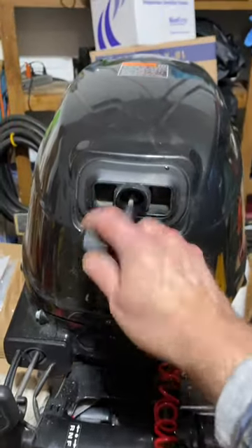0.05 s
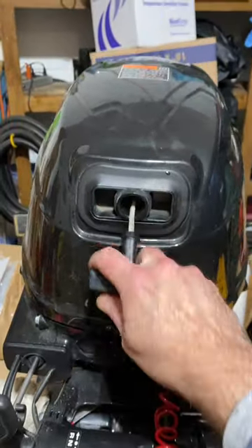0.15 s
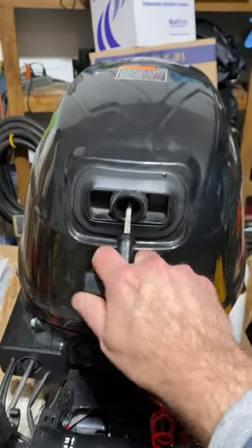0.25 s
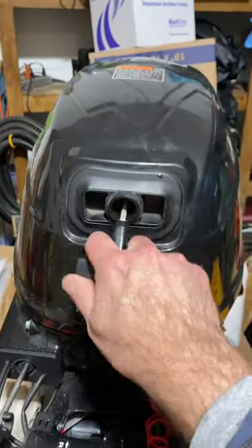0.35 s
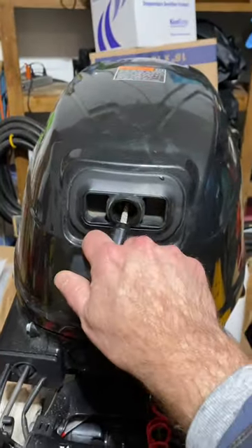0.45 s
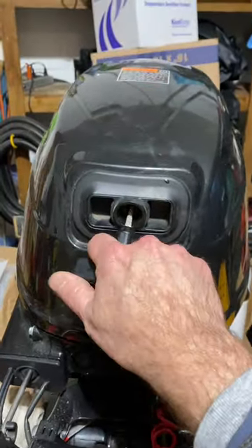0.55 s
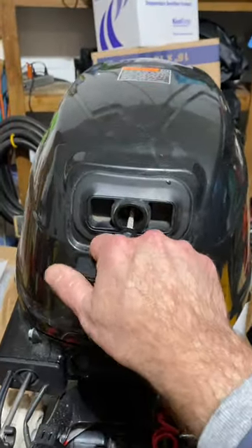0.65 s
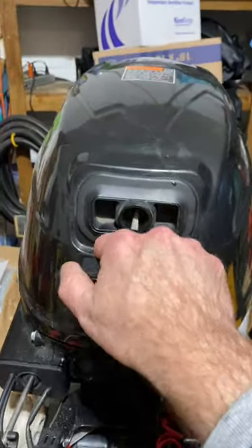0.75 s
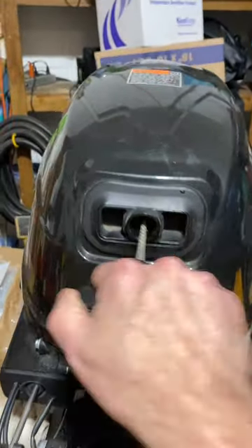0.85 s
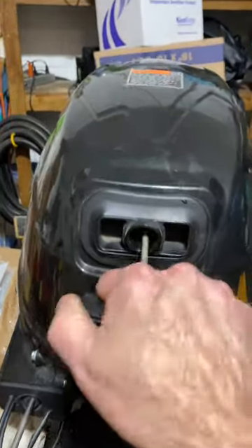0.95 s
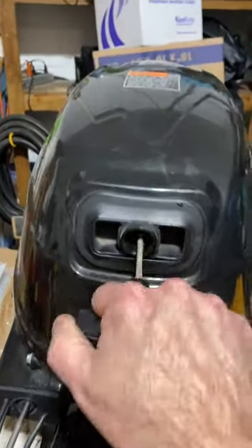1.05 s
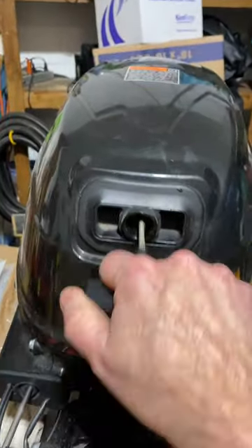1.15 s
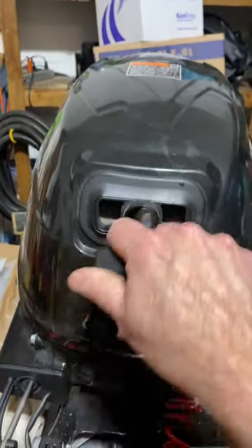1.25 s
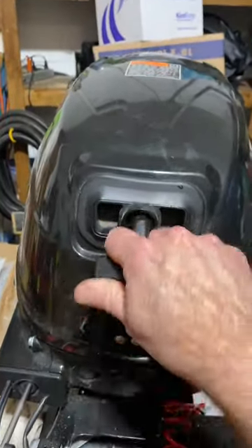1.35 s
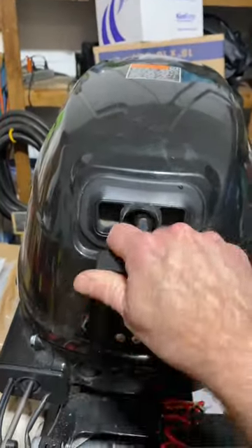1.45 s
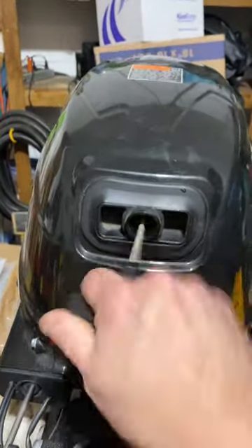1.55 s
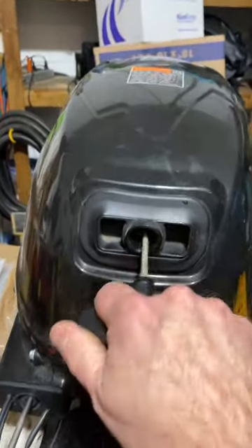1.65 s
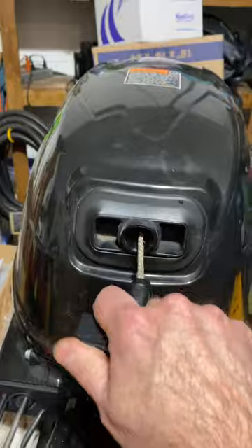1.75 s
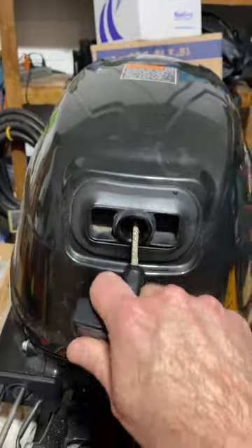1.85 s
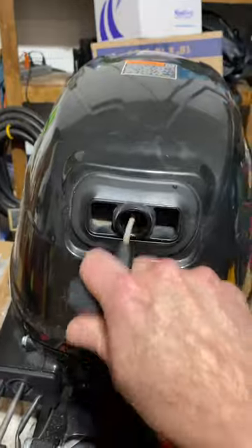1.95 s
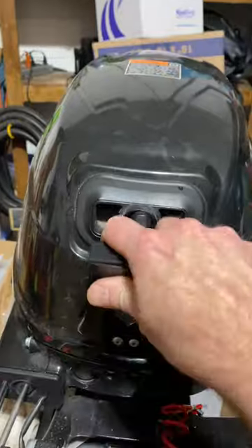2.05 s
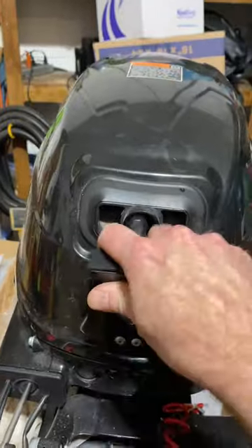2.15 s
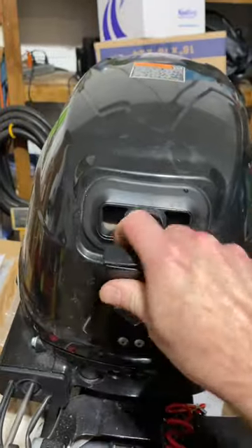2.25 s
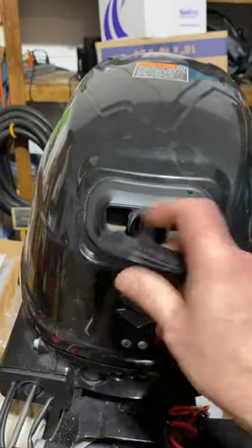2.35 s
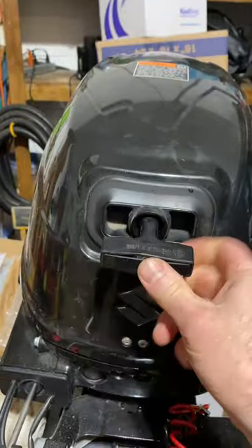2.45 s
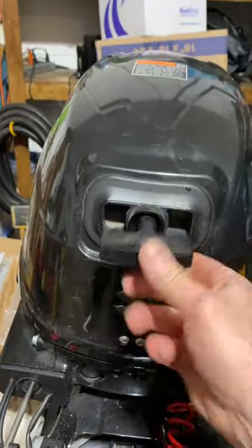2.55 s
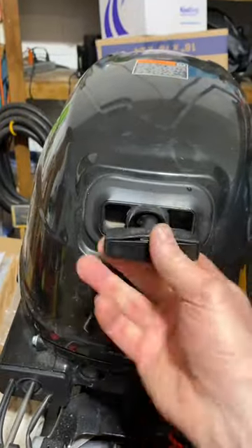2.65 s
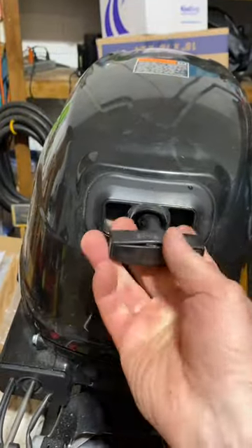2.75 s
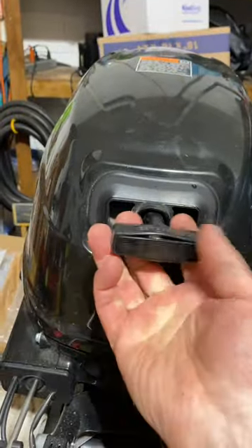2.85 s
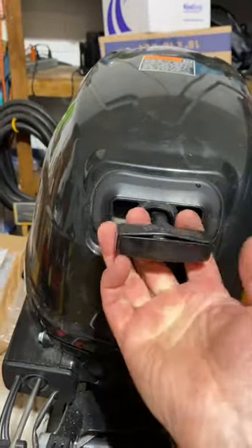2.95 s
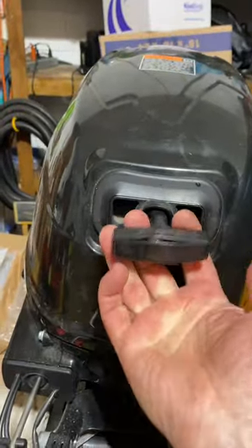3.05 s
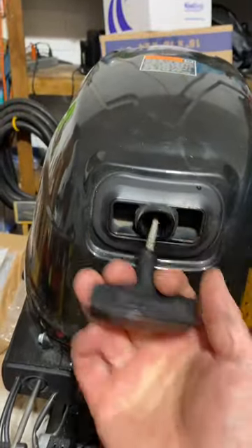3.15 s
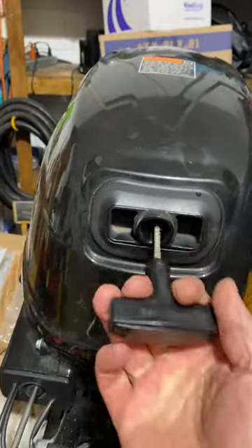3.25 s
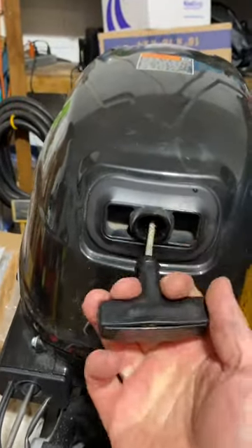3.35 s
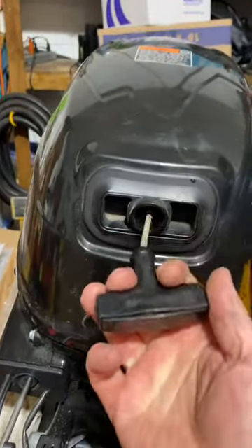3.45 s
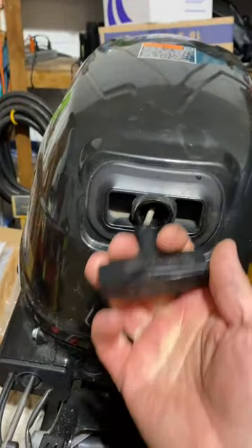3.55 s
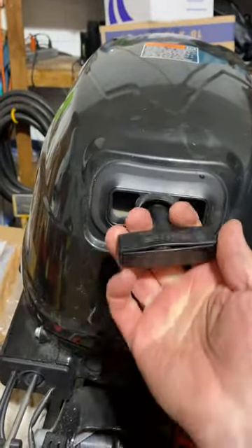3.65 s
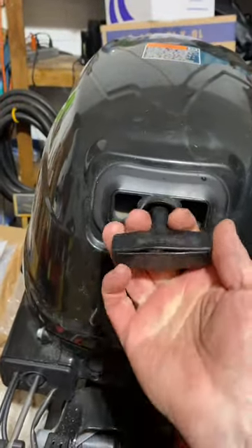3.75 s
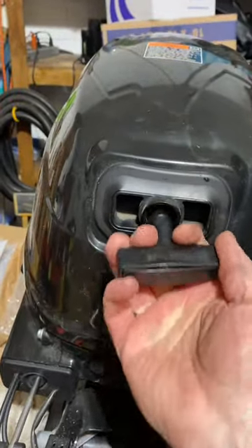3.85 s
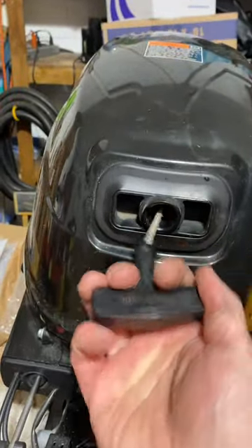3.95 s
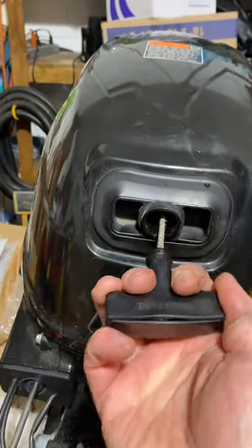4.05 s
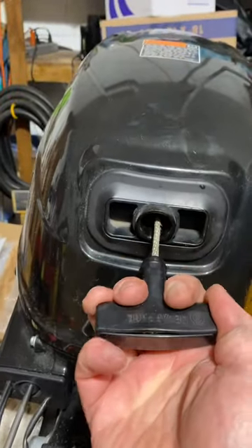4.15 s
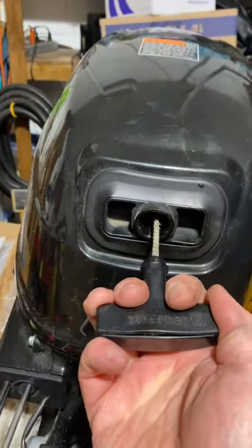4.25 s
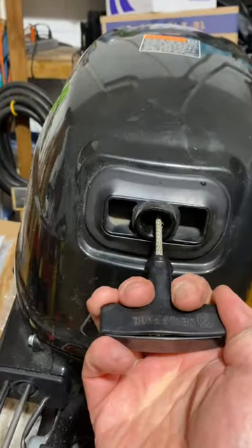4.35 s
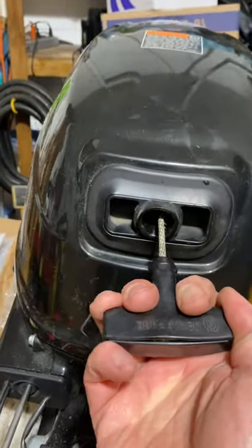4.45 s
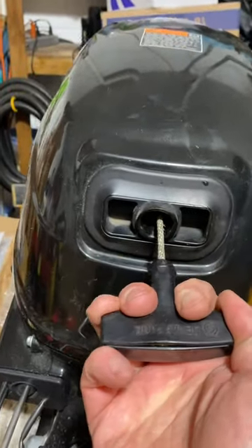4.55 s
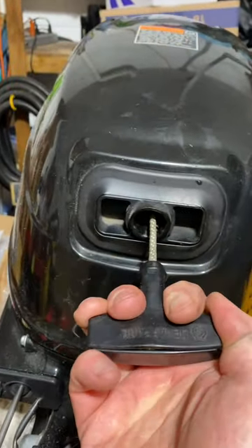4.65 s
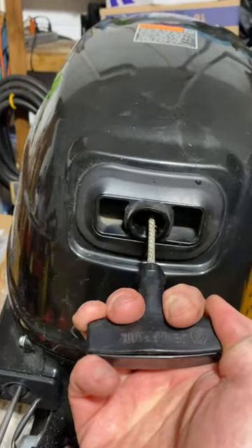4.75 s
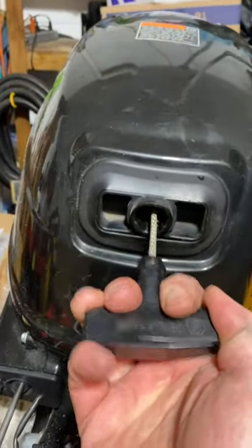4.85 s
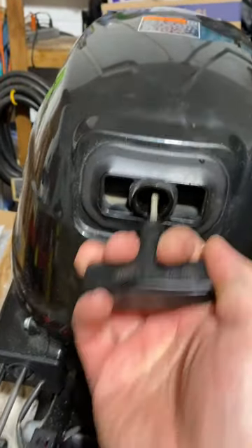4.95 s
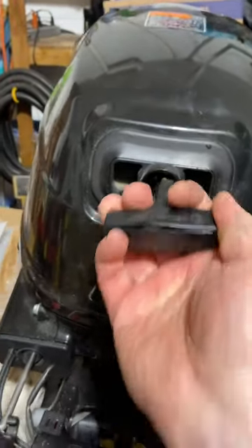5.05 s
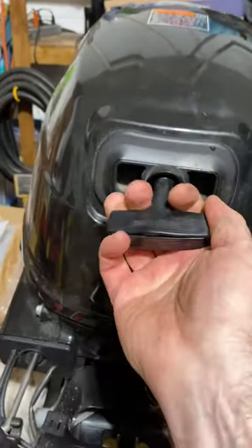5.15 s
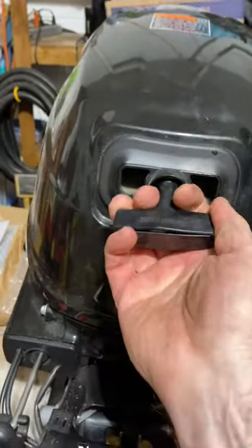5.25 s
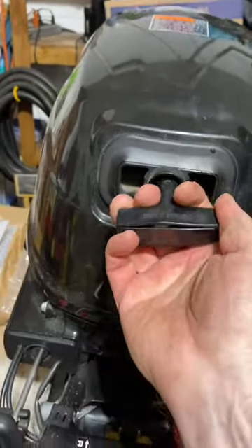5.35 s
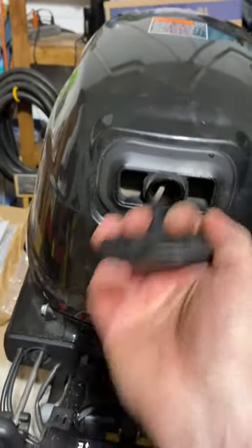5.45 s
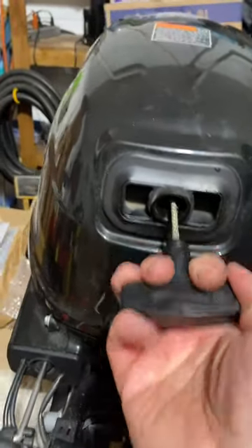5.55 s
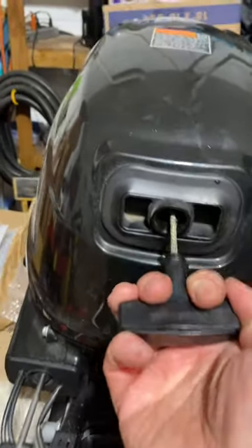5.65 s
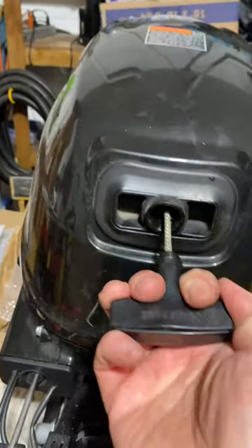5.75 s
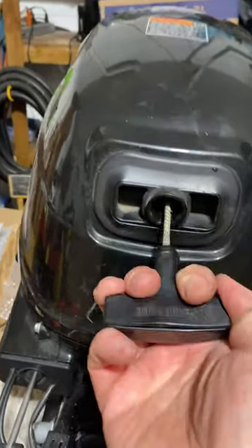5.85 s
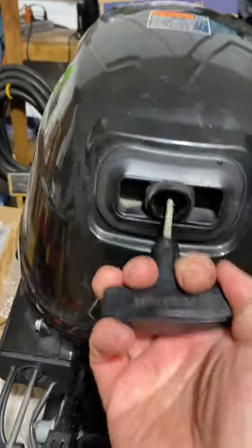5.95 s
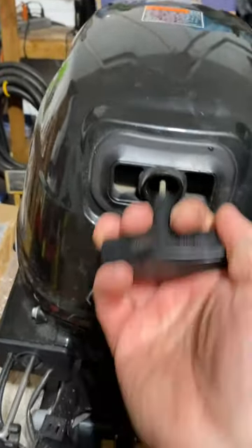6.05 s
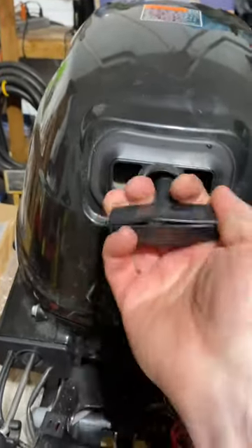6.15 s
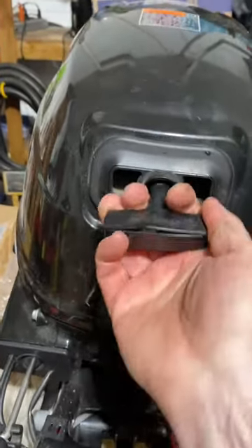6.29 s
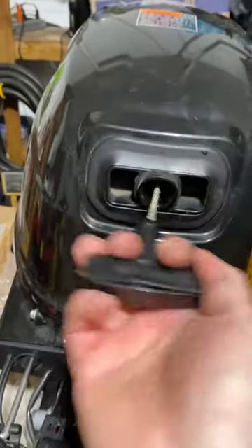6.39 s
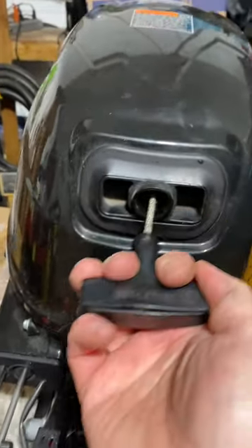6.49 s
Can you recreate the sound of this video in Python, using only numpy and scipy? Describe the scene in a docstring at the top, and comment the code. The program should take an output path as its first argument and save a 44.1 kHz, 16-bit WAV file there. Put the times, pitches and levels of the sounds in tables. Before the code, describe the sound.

Six short rope tugs jam with loud, clattering knocks, separated by small rattles, brief rewinding rub and light handle taps over faint room hum.

```python
"""Room hum, hiss and a faint whine are heard first; then a starter rope on a seized outboard is yanked six times.
Shaped noise makes the garage air and a few swishes; dying modes, crash noise and clicks make rattles in the cowl.
Each pull rubs up the slack through tiny slips and stops dead with a knock that rings the plastic cowl; a faint
bright burst comes just before the third. The rope jerks back, and five times the spring rewinds it with more rub.
The handle taps its hollow seat, with one soft ring among the taps; scattered echoes place it all in the garage."""
import sys
import numpy as np
from scipy import signal
from scipy.fft import rfft, irfft
from scipy.io import wavfile
from scipy.ndimage import uniform_filter1d

SR = 44100
rng = np.random.default_rng(int(sys.argv[2]) if len(sys.argv) > 2 else 0)


def to_wav(s):
    """Save 16-bit WAV."""
    ch = np.atleast_2d(s).T  # columns
    pcm = np.round(np.clip(ch, -1, 1) * 32767)  # PCM
    wavfile.write(sys.argv[1], SR, pcm.astype(np.int16))


N = 287532

# room hum and hiss, relative spectrum: pitch_hz, density_db (dB per Hz)
AIR_SPECTRUM = [(20, -32), (40, -3.5), (65, -0.5), (81, -14), (98, -3), (126, -10), (216, -15),
                (363, -19.5), (600, -25), (1600, -28.5), (2760, -26.5), (6500, -37), (12000, -44),
                (12600, -40), (13400, -68)]
AIR_DB = -41
# how alike the hiss is left and right: pitch_hz, likeness (0 to 1)
AIR_LIKENESS = [(150, 1), (350, 0.88), (700, 0.38), (1800, 0.88), (3000, 0.86), (5500, 0.55), (7000, 1),
                (15000, 1)]
# faint fuzzy whine in the room, before its waver: pitch_hz, width_hz, fuzz_db, pure_core_db
WHINE = (1264, 83, -58, -64)
WHINE_WAVER_DB, WHINE_WAVER_S = 1.2, 0.2
# faint airy swishes, perhaps sleeve or rope: start_s, length_s, pitch_hz, width_hz, level_db (before the swell shape)
SWISHES = [(4.08, .17, 8600, 700, -57), (5.36, .09, 5600, 700, -54), (5.235, .08, 1450, 160, -46),
           (.22, .06, 1600, 200, -54)]
# garage echo decay: pitch_hz, t60_s
GARAGE_DECAY = [(150, 0.22), (600, 0.52), (2000, 0.34), (6000, 0.36), (12000, 0.2)]
# pawls and pulley rattle inside the cowl; the row at 3.112 s is a faint bright burst just before the third knock:
# start_s, level_db, bass_db, upper_middle_db, treble_db
RATTLES_AND_BURST = [(0.363, -30.5, 3.5, -1.5, -14.5), (0.817, -36.5, -18, 7, -6),
                     (0.914, -29.5, -10, -5, -1.5), (1.017, -34.5, -20, 9.5, 1.5),
                     (1.121, -39.5, -29, -16, -25), (1.135, -34, -4, -1, -20), (1.154, -29, 3.5, 1.5, -6),
                     (1.188, -32, 1, 1, -16), (1.397, -41, 2, -3, -15), (1.515, -42, -4, -4, -2),
                     (1.548, -33, -14, 6, 7), (1.828, -40.5, -31, 8, 1), (1.876, -30, -5.5, -1.5, -8),
                     (1.93, -33, 19, -8, -25), (1.946, -33, -1.5, 1, -21), (2.584, -36.5, 38, 4, -20),
                     (3.087, -37, -12, 0, -16), (3.112, -32.5, 7, 20, 8), (3.224, -40.5, 2, -6, 16),
                     (3.236, -39, 4, -9, 13), (3.501, -44, 17, 0, -22), (3.519, -35.5, -4, -5, -17),
                     (3.527, -35, -10, -8, -18), (3.535, -41, 5, 1, -18), (3.59, -45.5, -13, 14, 14),
                     (3.853, -40.5, 20, 10, 6), (3.918, -39, -2, 9, -9), (4.408, -37, -8, -0.5, -0.5),
                     (4.982, -37, -12, -8, -24), (5.001, -31, -1, -9, -30), (5.009, -28, -3, -3, -23),
                     (5.028, -28, 2.5, 2, -12), (5.156, -32, 10, -8, -33), (5.188, -35.5, 24, -2, -30),
                     (5.472, -33, -3, 16, 7), (5.546, -31, 8, 0, 11), (5.991, -32.5, -19, -1, -5),
                     (6.047, -30.5, -6, -13, -28), (6.066, -29, 1, 1, -11), (6.111, -38.5, 8, -5, 1),
                     (6.331, -41.5, -11, 13, 0)]
RATTLE_DAMPING_DB_PER_S, RATTLE_CHATTER_S = 441, 0.00259
# cowl and engine block modes, before extra damping: pitch_hz, level_db, t60_s
COWL_MODES = [(137.4, -3.5, 0.16), (210.7, 11, 0.046), (338, 5, 0.091), (437.5, 2.5, 0.11),
              (598.4, -1, 0.13), (632, 1, 0.095), (694, -10, 0.041), (895.7, 1, 0.11), (983, -10, 0.12),
              (1144, -4, 0.12), (1224, -3, 0.058), (1375, -11.5, 0.13), (1536, -4, 0.045), (1642, -7, 0.1),
              (2019, -6, 0.047), (2112, -12.5, 0.038), (2258, -7, 0.033), (2420, -1.5, 0.026),
              (3075, -17, 0.073), (4100, -18, 0.022), (5120, -8, 0.024)]
# contact noise of hard parts, relative: pitch_hz, level_db
CRACK_SPECTRUM = [(2000, -1.5), (4000, -8.5), (5500, -9.5), (7500, -3), (10000, -12), (13000, -16),
                  (16500, -17)]
# loose metal parts crash together, relative and before extra damping: pitch_hz, level_db, t60_s
CRASH_BANDS = [(77.4, -22, 0.15), (235, 2.5, 0.3), (570, -2, 0.27), (1520, -9.5, 0.11), (2510, -9.5, 0.1),
               (2700, -18, 0.18), (4700, -13, 0.059), (7440, -19.5, 0.064), (11900, -27.5, 0.066),
               (16000, -38, .02)]
# the rope stops dead: start_s, level_db (before swell and bite), bass_db, upper_middle_db, treble_db, chatter_s,
# bite_hz, bite_db, swell_s, slack_s (before the stop), slack_start_rub_db, slack_end_rub_db, rebound_rub_db
KNOCKS = [(0.837, -10.5, -2.5, 0.5, 1, 0.0091, 1490, 7.5, 0.0058, 0.019, -53, -34, -31.5),
          (1.556, -8, -3.5, 3, 0, 0.011, 980, 4, 0.0053, 0.053, -51, -34.5, -34),
          (3.1233, -7.5, -4.5, 3.5, -1, .017, 1090, 2, 0.0013, 0.039, -40, -32, -33),
          (3.942, -11.5, -4, -2, -1.5, 0.014, 1000, -3.5, 0.013, 0.053, -55, -36.5, -40),
          (5.483, -8, -3, 5.5, 1.5, .012, 950, 3.5, 0.0056, 0.038, -48, -35, -33),
          (6.37, -6, -3.5, 1, 0.5, .012, 596, -0.5, 0.003, 0.036, -49, -20.5, -32)]
KNOCK_DAMPING_DB_PER_S = 133
SWELL_FROM_DB = -3  # a knock builds from this level while the parts jam
BITE_OCTAVES = 0.26  # width of the band singled out in each knock
# rope rub through the cowl, relative: pitch_hz, level_db
RUB_SPECTRUM = [(100, -3), (200, 3.5), (430, -11.5), (900, -7.5), (1500, -16.5), (2500, -12), (3500, -13.5),
                (6000, -32.5)]
# dull drone of the turning pulley, set beside the rub: pitch_hz, width_hz, level_db
PULLEY = (333, 260, -4.5)
SLACK_BRIGHT_DB = -11.5  # hiss beside the rub while slack is taken up
# the rope jerks back and settles
REBOUND_AFTER_S, REBOUND_S, REBOUND_FADE_DB, REBOUND_BRIGHT_DB = 0.0357, 0.22, -16.5, -23.5
# the spring winds the rope back: start_s, length_s, rub_db (as it starts)
REWINDS = [(1.12, 0.3, -39), (1.824, 0.33, -41.5), (3.496, 0.23, -48), (4.985, 0.35, -40),
           (5.997, 0.24, -36.5)]
REWIND_FADE_DB, REWIND_BRIGHT_DB = -8, -22
SLIPS_PER_S, SLIP_DAMPING_DB_PER_S, SLIP_RING_DB = 700, 506, -4
LURCH_DB, LURCH_S = 1.6, 0.012  # the rope moves in fits and starts
# the handle taps its seat; the row at 5.066 s is a soft ring near 1 kHz without an audible click:
# start_s, level_db (drive into the modes and click), bass_db, upper_middle_db, treble_db
TAPS_AND_RING = [(1.297, -19.5, -1.5, -2, -9), (1.347, -28.5, 3.5, 12, 11.5), (2.0478, -18, 0, -12, 8),
                 (2.113, -36, 7, -5, -5), (2.226, -33, -6, 3, -25), (2.379, -28.5, -7, 0.5, -19),
                 (2.409, -32.5, 1.5, 2, -15), (3.641, -27.5, 4, 2, 0.5), (3.678, -30, -12, -4, -28),
                 (3.765, -49, -17, 18, 1), (5.066, -18, -6.5, -34, -40), (5.105, -21.5, 1, 5, 4),
                 (5.128, -18.5, -1, 1.5, -9), (6.143, -18, -0.5, 12, 2), (6.206, -17, -10.5, -0.5, -9)]
# handle and hollow seat modes, before damping: pitch_hz, level_db, t60_s
HANDLE_MODES = [(138, 10.5, 0.036), (214, 6, 0.044), (356.7, 1, 0.093), (414.2, -0.5, 0.12),
                (643, -5.5, 0.039), (1030, -5, 0.036), (1280, -1, 0.017), (1690, -1.5, 0.0089),
                (2154, 4, 0.009), (4270, 5, 0.0061), (4590, -11, 0.018)]
TAP_HOLD_S, TAP_DAMPING_DB_PER_S = 0.018, 600  # rings freely, then the hand on the handle stops it
TAP_ECHO_HZ = 1960  # the click of a tap reaches the walls dulled
# the engine sits mostly a little to the right: pitch_hz, left_minus_right_db
NEAR_PAN = [(150, 0.3), (600, -1.9), (1500, -2), (5000, -2), (9000, 1)]
# level between the two microphone ports: pitch_hz, left_minus_right_db
PORT_LEVEL = [(150, -0.5), (700, -1.5), (1400, 0), (2100, 0.5), (3000, 0.5), (6000, 0)]
# phase between the two microphone ports: pitch_hz, left_lead_rad
PORT_PHASE = [(300, 0.066), (700, 0.48), (1300, 0.28), (2000, 0.17), (3000, 1.09), (5300, 0.69),
              (6800, 2.65), (8000, 3.71), (9000, 5.07), (10000, 6.6), (11000, 7.42), (13000, 8.9),
              (15500, 10.2)]
MIC_LOW_HZ, EDGE_HZ = 52.3, 16300
SIDES = np.array([[.5], [-.5]])  # shares a left-right difference equally


def gain_of(db):
    """dB to amplitude."""
    return 10 ** (np.asarray(db) / 20)


def evened(x):
    """Scales to rms 1."""
    return x / np.sqrt(np.mean(x ** 2) + 1e-20)


def read(points, hz):
    """Reads a curve on a log frequency axis."""
    f, value = np.transpose(points)
    return np.interp(np.log(hz + 1), np.log(f + 1), value)


def add(mix, s, sound):
    """Mixes a sound in at time s."""
    part = mix[round(s * SR):][:len(sound)]
    part += sound[:len(part)]


def coloured(x, gain):
    """Filters by a gain given as a function of Hz."""
    size = x.shape[-1]
    return irfft(rfft(x) * gain(np.fft.rfftfreq(size, 1 / SR)), size)


def band_noise(size, centre_hz, width_hz):
    """Noise in a soft bell-shaped band, at rms 1."""
    return evened(coloured(rng.standard_normal(size), lambda hz: np.exp(-((hz - centre_hz) / width_hz) ** 2)))


def wander(length_s):
    """Slow random drift at rms 1: noise averaged over length_s."""
    return evened(uniform_filter1d(rng.standard_normal(N), round(length_s * SR)))


def hiss():
    """Room hum and hiss: stereo noise with slight patches in pitch and time, partly shared by both sides."""
    frames, hz = N // 512 + 5, np.fft.rfftfreq(2048, 1 / SR)
    a, b, c, d, patches = rng.standard_normal((5, 1025, frames))
    patches = evened(uniform_filter1d(uniform_filter1d(patches, 12, 0), 7, 1))
    same = np.minimum(read(AIR_LIKENESS, hz), 1)[:, None]
    left, other = a + 1j * b, c + 1j * d
    right = same * left + np.sqrt(1 - same ** 2) * other
    spectrum = np.array([left, right]) * gain_of(read(AIR_SPECTRUM, hz)[:, None] + 1.2 * patches)
    sound = signal.istft(spectrum, nperseg=2048, noverlap=1536)[1][:, :N]
    return gain_of(AIR_DB) * evened(sound)


def whine():
    """A pure tone wrapped in a narrow band of fuzz, wavering in level together."""
    whine_hz, width, fuzz_db, core_db = WHINE
    fuzz = coloured(rng.standard_normal(N), lambda hz: 1 / (1 + (2 * (hz - whine_hz) / width) ** 2))
    core = np.sin(2 * np.pi * whine_hz * np.arange(N) / SR)
    tone = gain_of(fuzz_db) * evened(fuzz) + gain_of(core_db) * evened(core)
    return tone * gain_of(WHINE_WAVER_DB * wander(WHINE_WAVER_S))


def swishes():
    """Soft puffs of band noise that swell and fade."""
    out = np.zeros(N)
    for s, length, hz, width, db in SWISHES:
        puff = band_noise(round(length * SR), hz, width)
        add(out, s, gain_of(db) * puff * np.hanning(len(puff)))
    return out


def garage(x):
    """Scattered echoes of random sign, partly shared by both sides, each band dying at its own speed."""
    taps = np.zeros((2, SR // 2))
    at = np.arange(300, SR // 2 - 20, 20)
    at = at + rng.integers(0, 20, (2, len(at)))
    np.put_along_axis(taps, at, rng.choice([-1., 1.], at.shape), 1)
    taps[1] = 0.85 * taps[0] + 0.5 * taps[1]
    hz, t, z = signal.stft(taps, SR, nperseg=256)
    fade = gain_of(-60 * t / read(GARAGE_DECAY, hz)[:, None])
    tail = signal.istft(z * fade, SR, nperseg=256)[1]
    tail = tail / np.linalg.norm(tail, axis=1)[:, None]
    return signal.fftconvolve(x[None], tail, axes=1)[:, :N]


def tilt(bass_db, upper_db, treble_db, hz):
    """How much bass, upper middle and treble a sound excites beside the middle."""
    return read([(420, bass_db), (620, 0), (1100, 0), (2000, upper_db), (3600, treble_db)], hz)


def ring(modes, colour, vary_db, rise_turns, spread):
    """Dying modes, each with a weaker neighbour; every blow lands elsewhere, so the mix varies."""
    hz, db, t60 = np.tile(np.transpose(modes), 2)[:, :, None]
    t = np.arange(SR // 4) / SR
    level_chance, phase_chance, pitch_chance = rng.standard_normal((3, len(hz), 1))
    neighbour = np.arange(len(hz))[:, None] >= len(modes)
    db = db + tilt(*colour, hz) + vary_db * level_chance - 7 * neighbour
    hz = hz * (1 + spread * pitch_chance * np.where(neighbour, 1, 0.08))
    build = (1 - np.exp(-t * hz / rise_turns)) ** 2  # low modes take longer to build
    tone = np.sin(2 * np.pi * hz * t + 2 * phase_chance)
    return (gain_of(db - 60 * t / t60) * build * tone).sum(0)


def crack(treble_db, t60):
    """Short bright noise of hard parts meeting."""
    t = np.arange(4096) / SR
    noise = evened(coloured(rng.standard_normal(4096), lambda hz: gain_of(read(CRACK_SPECTRUM, hz))))
    fade = gain_of(-60 * t / t60)
    burst = fade * noise
    return gain_of(treble_db) * burst * np.linalg.norm(fade) / np.linalg.norm(burst)


def crash(colour):
    """Noise too dense for single modes, each band dying at its own speed."""
    hz, t, z = signal.stft(rng.standard_normal(SR // 4), SR, nperseg=256, noverlap=192)
    bands = np.array(CRASH_BANDS)
    db = read(bands[:, :2], hz) + tilt(*colour, hz)
    t60 = read(bands[:, ::2], hz)
    fade = gain_of(db[:, None] - 60 * t / t60[:, None])
    noise = signal.istft(z * fade, SR, nperseg=256, noverlap=192)[1]
    return 10 * noise[:SR // 4] * (1 - np.exp(-np.arange(SR // 4) / 40))


def blow(db, colour, chatter_s, damping, count, crack_db, crash_db, restrike, first, rise_turns):
    """Uneven contacts bounce over the chatter time; each strikes the cowl again and loose parts answer it anew."""
    t = np.arange(SR // 4) / SR
    at = (np.arange(count) + rng.random(count)) / count * (np.arange(count) > 0)  # fraction of the chatter
    uneven = gain_of(3.8 * rng.standard_normal(count) * (at > 0)) * rng.choice([-1, 1], count)
    body = np.zeros(len(t))
    for late, size in zip(at, uneven):
        strength = size * (1 - 0.87 * late) * (1 if late else first) / np.sqrt(count)
        cowl = ring(COWL_MODES, colour, vary_db=2.5, rise_turns=rise_turns, spread=0.043)
        answer = gain_of(crash_db) * crash(colour) + (restrike if late else 1) * cowl
        add(answer, 0, crack(colour[-1] + crack_db, t60=0.011))
        add(body, late * chatter_s, strength * answer)
    body = body * gain_of(-damping * np.maximum(t - chatter_s, 0))
    return gain_of(db) * body / np.sqrt(np.mean(body[:1024] ** 2))  # level set on the first 1024 samples


def rattles_and_burst():
    """Pawls and pulley clatter in pairs of quick, soon damped contacts; one bright burst is built the same way."""
    out = np.zeros(N)
    for s, db, *colour in RATTLES_AND_BURST:
        add(out, s, blow(db, colour, RATTLE_CHATTER_S, RATTLE_DAMPING_DB_PER_S, count=2, crack_db=2.5,
                         crash_db=5.0, restrike=0.77, first=2.3, rise_turns=0.3))
    return out


def strokes():
    """Every movement of the rope: start_s, length_s, first_db, last_db, bright_db (hiss beside the rub)."""
    slack = [(s - lead, lead, first_db, last_db, SLACK_BRIGHT_DB)
             for s, *_, lead, first_db, last_db, _ in KNOCKS]
    rebound = [(s + REBOUND_AFTER_S, REBOUND_S, db, db + REBOUND_FADE_DB, REBOUND_BRIGHT_DB)
               for s, *_, db in KNOCKS]
    rewind = [(s, length, db, db + REWIND_FADE_DB, REWIND_BRIGHT_DB) for s, length, db in REWINDS]
    return slack + rebound + rewind


def rope():
    """Many tiny uneven slips over the guide rub, hiss and briefly ring the cowl, while the pulley drones."""
    t, level, bright = np.arange(N) / SR, np.zeros(N), np.zeros(N)
    for s, length, first_db, last_db, bright_db in strokes():
        edges = np.clip(np.minimum(t - s, s + length - t) / .002, 0, 1)
        stroke = gain_of(np.interp(t, [s, s + length], [first_db, last_db])) * edges
        level += stroke
        bright += gain_of(bright_db) * stroke
    lurch = gain_of(LURCH_DB * wander(LURCH_S))
    level, bright = level * lurch, bright * lurch

    size = gain_of(4 * np.minimum(rng.exponential(1, N), 4))
    slips = size * (rng.random(N) < SLIPS_PER_S / SR) * rng.choice([-1, 1], N)
    dull = evened(coloured(slips, lambda hz: gain_of(read(RUB_SPECTRUM, hz))))
    slip_hiss = evened(coloured(slips, lambda hz: gain_of(read(CRACK_SPECTRUM, hz))))
    cowl = ring(COWL_MODES, (-2, 3, -3), vary_db=4.5, rise_turns=0.11, spread=0.027)
    cowl = cowl * gain_of(-SLIP_DAMPING_DB_PER_S * t[:SR // 4])
    rung = signal.oaconvolve(level * evened(slips), cowl / np.linalg.norm(cowl))[:N]

    rub = evened(coloured(rng.standard_normal(N), lambda hz: gain_of(read(RUB_SPECTRUM, hz))))
    pulley_hz, width, pulley_db = PULLEY
    drone = gain_of(pulley_db) * band_noise(N, pulley_hz, width)
    return gain_of(SLIP_RING_DB) * rung + level * (drone + 0.58 * dull + 0.62 * rub) + bright * slip_hiss


def knocks():
    """The rope stops dead: five jamming contacts swell up and ring the cowl, one band set apart by its bite."""
    out = np.zeros(N)
    for s, db, bass_db, upper_db, treble_db, chatter_s, bite_hz, bite_db, swell_s, *_ in KNOCKS:
        knock = blow(db, (bass_db, upper_db, treble_db), chatter_s, KNOCK_DAMPING_DB_PER_S, count=5,
                     crack_db=-0.5, crash_db=-2.5, restrike=1.34, first=0.74, rise_turns=0.82)
        t = np.arange(len(knock)) / SR
        knock = knock * gain_of(SWELL_FROM_DB * np.maximum(1 - t / swell_s, 0))

        def bite(hz):
            """Bell-shaped boost or cut around bite_hz."""
            return gain_of(bite_db * np.exp(-(np.log2((hz + 1) / bite_hz) / BITE_OCTAVES) ** 2))
        add(out, s, coloured(knock, bite))
    return out


def taps_and_ring():
    """Handle taps: a click, then the hollow seat answers until damped; one soft ring has its click turned far down."""
    out = np.zeros(N)
    for s, db, *colour in TAPS_AND_RING:
        sound = ring(HANDLE_MODES, colour, vary_db=2.0, rise_turns=1.05, spread=0.072)
        add(sound, 0, crack(colour[-1] - 3, t60=0.014))
        held_s = np.maximum(np.arange(len(sound)) / SR - TAP_HOLD_S, 0)
        add(out, s, gain_of(db - TAP_DAMPING_DB_PER_S * held_s) * sound)
    return out


def scene():
    """Room air, with swishes, starter, rope and handle close by and their garage echo."""
    air = hiss() + whine()
    engine = swishes() + rattles_and_burst() + rope() + knocks()
    taps = taps_and_ring()
    near = coloured(engine + taps, lambda hz: gain_of(SIDES * read(NEAR_PAN, hz)))
    dulled_taps = coloured(taps, lambda hz: 1 / np.hypot(1, (hz / TAP_ECHO_HZ) ** 2))
    return near + garage(gain_of(-14.0) * engine + gain_of(-10.5) * dulled_taps) + air


def record(dry):
    """Two ports differ in level and phase; the deepest bass drops, peaks overload, then the band limit."""
    ports = coloured(dry, lambda hz: gain_of(SIDES * read(PORT_LEVEL, hz))
                     * np.exp(1j * SIDES * read(PORT_PHASE, hz)))
    bass_cut = signal.butter(3, MIC_LOW_HZ, "high", fs=SR, output="sos")
    clipped = np.clip(signal.sosfilt(bass_cut, ports), -1, 1)
    band_limit = signal.firwin(511, EDGE_HZ, window=("kaiser", 9), fs=SR)
    return signal.oaconvolve(clipped, band_limit[None], "same")


dry = scene()
out = record(dry)
to_wav(out)
```